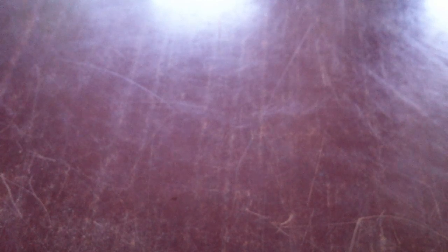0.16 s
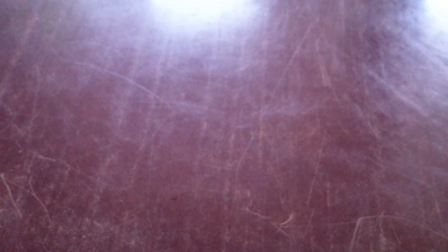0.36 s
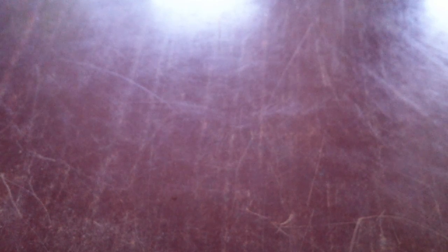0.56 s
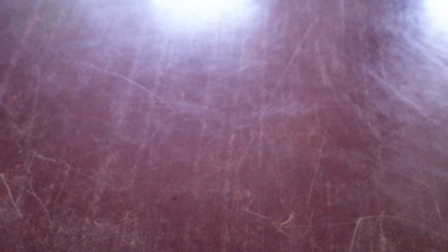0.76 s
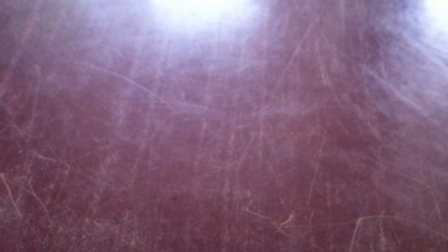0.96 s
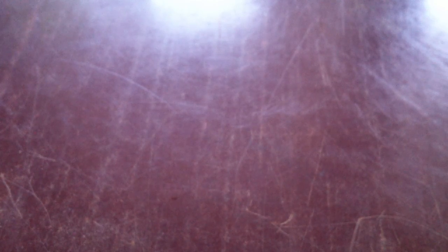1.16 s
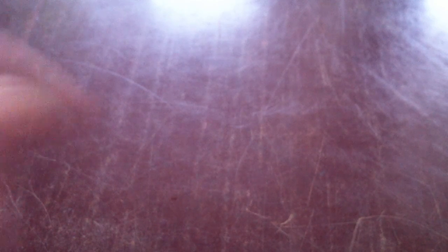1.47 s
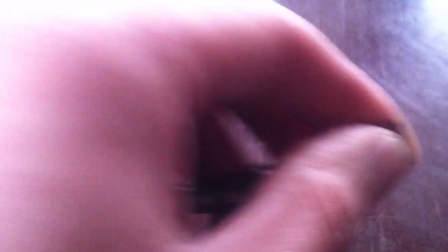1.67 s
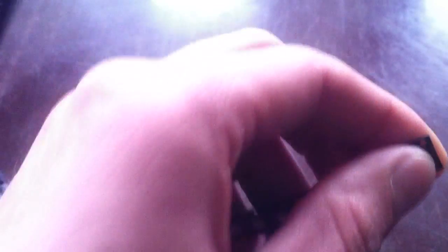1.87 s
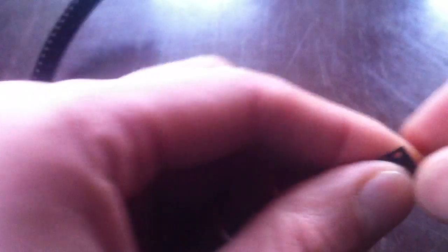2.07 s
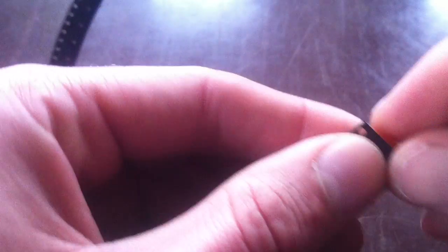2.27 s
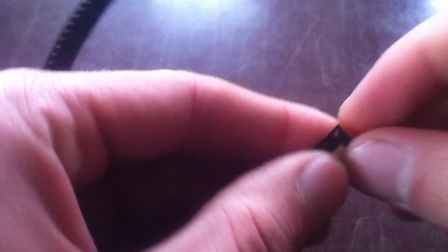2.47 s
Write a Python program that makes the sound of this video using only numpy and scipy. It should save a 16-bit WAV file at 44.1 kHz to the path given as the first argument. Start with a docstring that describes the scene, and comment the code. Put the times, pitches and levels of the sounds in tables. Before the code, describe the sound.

Close up in a small, quiet room, a thin plastic strip gives sharp ticks and tiny scuffs in the fingers, slides briefly, then rasps loudly over an edge with a bench knock and a ringing tail.

```python
"""A strip of plastic carrier tape ticks, scuffs and slides in the fingers, then rasps over an edge.
Ticks and catches are snaps of short strip modes, a click and scattered crackle; each catch also feeds
a dense ring, clear modes and a sinking body tone. Scuffs, slide and hand rustle are grainy friction.
Bench bumps are struck low modes; touches and pushes of the hand are swells of low noise.
Shaped noise gives a faint room hiss and the room's echo."""
import sys
import numpy as np
from scipy import signal
from scipy.fft import rfft, irfft
from scipy.io import wavfile

SR = 44100
rng = np.random.default_rng(int(sys.argv[2]) if len(sys.argv) > 2 else 0)


def digitize_waveform(pressure):
    """Quantize a signal to 16-bit integers and store it at the path in sys.argv[1].

    Rows of a 2-D input are taken as channels; values are limited to [-1, 1].
    """
    field = np.atleast_2d(pressure).T
    bounded = np.clip(field, -1, 1)
    quanta = np.round(bounded * 32767).astype(np.int16)
    wavfile.write(sys.argv[1], SR, quanta)


N = 114660  # length in samples


def amp(db):
    """Decibels to gain."""
    return 10 ** (np.asarray(db) / 20)


def unit(x):
    """Scales a sound to energy 1."""
    return x / np.sqrt(np.sum(x ** 2) + 1e-20)


def evened(x):
    """Scales a sound to rms 1."""
    return unit(x) * np.sqrt(len(x))


def noise(length):
    """White noise."""
    return rng.standard_normal(length)


def read(points, hz):
    """Reads a curve of (pitch_hz, value) points on a log-frequency axis."""
    point_hz, value = np.transpose(points)
    return np.interp(np.log(hz + 1), np.log(point_hz + 1), value)


def level(points):
    """Gain over time from (time_s, level_db) points."""
    return amp(np.interp(np.arange(N) / SR, *np.transpose(points)))


def add(mix, start_s, sound):
    """Mixes a sound in at its start time, cut off at the end of the mix."""
    part = mix[max(round(start_s * SR), 0):][:len(sound)]
    part += sound[:len(part)]


def coloured(x, points):
    """Gives a steady sound a spectrum, at rms 1."""
    gain = amp(read(points, np.fft.rfftfreq(len(x), 1 / SR)))
    return evened(irfft(rfft(x) * gain, len(x)))


def edge(x, hz, kind, order=2):
    """High-pass or low-pass filter."""
    sections = signal.butter(order, min(hz, SR / 2 - 1), kind, fs=SR, output="sos")
    return signal.sosfilt(sections, x)


def modes(table, t):
    """Struck modes: decaying sines, together at energy 1."""
    return unit(sum(amp(db - 60 * t / t60) * np.sin(2 * np.pi * hz * t) for hz, db, t60 in table))


def tail(colour, t60s):
    """Dense ringing: noise whose bands die at their own speeds, energy 1."""
    hz, t, bands = signal.stft(coloured(noise(SR // 2), colour), SR, nperseg=256)
    decay = amp(-60 * t / read(t60s, hz)[:, None])
    return unit(signal.istft(bands * decay, SR, nperseg=256)[1])


GRAINS_PER_S, GRAIN_SPREAD_DB = 3000, 3.5
GRAIN_SHARE = 0.77  # share of the energy in grains; the rest is smooth hiss
CLUMP_DB, CLUMP_HZ = 1.5, 107  # depth and top rate of the sticking and slipping


def friction(colour):
    """Tiny slips of uneven size over a smooth hiss, in clumps as the surface sticks and lets go."""
    sizes = amp(GRAIN_SPREAD_DB * np.minimum(rng.exponential(1, N), 5))
    signs = rng.choice([-1, 1], N)
    slips = sizes * signs * (rng.random(N) < GRAINS_PER_S / SR)
    clumps = amp(CLUMP_DB * evened(edge(noise(N), CLUMP_HZ, "low")))
    grains = np.sqrt(GRAIN_SHARE) * evened(slips * clumps)
    hiss = np.sqrt(1 - GRAIN_SHARE) * evened(noise(N))
    return coloured(grains + hiss, colour)


def swells(table, colour):
    """Brief, soft-edged swells of coloured noise."""
    out = np.zeros(N)
    for start_s, length_s, level_db in table:
        swell = np.hanning(round(length_s * SR))
        grain = evened(coloured(noise(SR // 4), colour)[:len(swell)])
        add(out, start_s, amp(level_db) * swell * grain)
    return out


# spectrum of the room hiss: pitch_hz, level_db
HISS_COLOUR = [(15, -36), (25, -2.5), (59, -23.5), (169, -1.5), (433, -6), (620, -7.5), (1100, -11.5),
               (1800, -16), (3260, -15.5), (8580, -14), (15500, -26)]
HISS_DB = -71


def room_hiss():
    """Steady background hiss: white noise given a fixed spectrum."""
    return amp(HISS_DB) * coloured(noise(N), HISS_COLOUR)


# loudness of the hands' dull rustle: time_s, level_db
RUSTLE_LEVEL = [(0, -74), (.5, -71.5), (.62, -69), (.9, -72.5), (1.2, -71), (1.33, -65), (1.5, -66),
                (1.78, -65.5), (2.2, -63), (2.28, -65), (2.45, -68), (2.6, -70)]
# spectrum of that rustle: pitch_hz, level_db
RUSTLE_COLOUR = [(60, -27), (140, -16), (230, -2), (330, -11.5), (600, -13), (1500, -13), (4000, -15),
                 (12000, -23)]


def hand_rustle():
    """Soft friction of the hands, its loudness following the movement."""
    return friction(RUSTLE_COLOUR) * level(RUSTLE_LEVEL)


# scuffs of fingers and strip, each played for twice length_s: start_s, length_s, level_db, low_edge_hz
SCUFFS = [(0.221, 0.018, -46, 3620), (0.239, 0.015, -42.5, 2000), (0.522, 0.037, -53.5, 2930),
          (0.552, 0.018, -56.5, 3520), (0.575, 0.012, -42, 4200), (0.608, 0.039, -53, 3740),
          (0.643, 0.016, -45, 3200), (0.673, 0.032, -52, 3020), (0.704, 0.03, -51, 2950),
          (0.736, 0.054, -55.5, 3500), (0.774, 0.013, -36, 2860), (0.787, 0.058, -53, 2930),
          (0.904, 0.013, -53.5, 2510), (1.14, 0.015, -58, 2900), (1.248, 0.013, -46.5, 3000),
          (1.295, 0.039, -56, 3000), (1.314, 0.024, -54, 2500), (1.734, 0.028, -53, 2420),
          (2.074, 0.023, -49.5, 2500), (2.107, 0.053, -57, 2520), (2.215, 0.034, -65, 1050)]
# spectrum of the rub before its low edge: pitch_hz, level_db
SCUFF_COLOUR = [(200, -6), (1000, -7), (3000, 3), (6500, 7), (9000, 4), (11000, -6), (16000, 2)]
SCUFF_ATTACK_S = 0.003
SCUFF_FADE_DB = -12.5  # how far a scuff has faded at length_s


def scuffs():
    """Short friction rubs that start quickly and fade ever faster."""
    out = np.zeros(N)
    rub = friction(SCUFF_COLOUR)
    for start_s, length_s, level_db, low_hz in SCUFFS:
        t = np.arange(0, 2 * length_s, 1 / SR)
        grain = evened(edge(rub[round(start_s * SR):][:len(t)], low_hz, "high"))
        attack = np.minimum(t / SCUFF_ATTACK_S, 1)
        add(out, start_s, grain * attack * amp(level_db + SCUFF_FADE_DB * (t / length_s) ** 3))
    return out


# short modes of the strip at pitch ratio 1: pitch_hz, level_db, t60_s
STRIP_MODES = [(2836, 4, 0.009), (4840, -5, 0.0095), (6000, 8, 0.0039), (6720, 5, 0.0075),
               (8950, -11, 0.0082), (12000, -4, 0.0097), (14200, -3, 0.009), (15300, 3.5, .008)]
# spectrum of the scattered crack: pitch_hz, level_db
CRACK_COLOUR = [(100, -48), (600, 2.5), (1800, -10), (3000, -1.5), (7000, -8), (10000, -3), (16000, -9.5)]
# dull push under each snap, before its 220 Hz high-pass: pitch_hz, level_db, t60_s
THOCK_MODES = [(169, -13, 0.0084), (656, 4, 0.0048)]
THOCK_DB = -25
SPIKE_TOP_HZ = 9000  # top of the band of the sharp first edge


def snap(low_hz, high_hz, scatter, pitch_ratio, crack_s, leak_db, spike_db):
    """A sharp edge, strip modes pitched by the grip and a scattered crack, in the contact's band."""
    t = np.arange(SR // 30) / SR
    scatter = np.clip(scatter, 0, 1)
    crack = unit(coloured(noise(len(t)), CRACK_COLOUR) * np.exp(-t / crack_s))
    spike = unit(edge(1. * (t == 0), SPIKE_TOP_HZ, "low"))
    strip = unit(modes(STRIP_MODES, t * pitch_ratio) + amp(spike_db) * spike)
    contact = np.sqrt(1 - scatter) * strip + np.sqrt(scatter) * crack
    # a steep low cut, with a little of a gentler one leaking through
    steep = edge(contact, low_hz, "high", order=3)
    leak = amp(leak_db) * edge(contact, low_hz, "high", order=1)
    thock = edge(modes(THOCK_MODES, t), 220, "high")
    return unit(edge(steep + leak, high_hz, "low")) + amp(THOCK_DB) * thock


# ticks of the plastic strip (scatter is held to 0-1):
# start_s, level_db, low_edge_hz, high_edge_hz, scatter, pitch_ratio
TICKS = [(0.236, -23.5, 5000, 7700, 0.5, 1), (0.2421, -5, 2070, 15000, 0.05, 1.04),
         (0.3325, -18.5, 3750, 11400, 0.22, 0.99), (0.4183, -36, 5140, 9800, 0.3, 1.2),
         (0.5764, -22, 7400, 16200, 0.1, 1.35), (0.5914, -25, 7860, 16000, 0, 1.24),
         (0.613, -31, 4530, 11000, 0.5, 0.84), (.646, -45, 3520, 11000, 0.5, 1.7),
         (0.679, -31, 3520, 11100, 1.1, 1.1), (0.7107, -28, 5000, 12000, 0.1, 1.1),
         (.774, -13.5, 3330, 12700, 0.77, 0.79), (0.777, -21.5, 2420, 12100, 0.8, 1.28),
         (0.7969, -25, 4000, 11000, 0.9, 0.73), (0.813, -23.5, 4000, 10000, 0.44, 0.88),
         (0.926, -39, 895, 1446, 0.5, 0.42), (1.0579, -35.5, 5870, 14000, 0.46, 1.3),
         (1.2533, -24, 4540, 15100, 0, 1.05), (1.255, -24.5, 1670, 15000, 0, 0.85),
         (1.2964, -31.5, 3520, 10000, 0.2, 1.14), (1.3152, -24.5, 3340, 12100, 0.5, 1.1),
         (1.3246, -23.5, 4720, 11100, 0.3, 1.04), (1.4011, -25, 4000, 12000, 1.15, 1.2),
         (1.6034, -33, 1500, 2300, 0.1, 0.66), (1.7092, -32, 6650, 16300, 0.6, 1.6)]
# spectrum of the soft echo of a tick before its band edges: pitch_hz, level_db
TICK_ECHO_COLOUR = [(500, -18), (1200, -4), (2500, -3.5), (3400, -3.5), (4300, -4.5), (6500, 2),
                    (8500, -3.5), (10500, -8), (15000, -9)]
# decay of the room, for tick echoes and the room's echo alike: pitch_hz, t60_s
ROOM_T60 = [(200, 0.21), (2000, 0.61), (7000, 0.28), (15000, 0.22)]
TICK_CRACK_S, TICK_LEAK_DB = 0.0016, -42
TICK_SPIKE_DB, TICK_ECHO_DB = -8.5, -16  # beside the modes; beside the tick


def ticks():
    """Single snaps as the strip flexes, each with a soft, diffuse echo in its own band."""
    out = np.zeros(N)
    for start_s, level_db, low_hz, high_hz, scatter, pitch_ratio in TICKS:
        echo = edge(tail(TICK_ECHO_COLOUR, ROOM_T60), low_hz, "high")
        echo = unit(edge(echo, high_hz, "low"))
        tick = snap(low_hz, high_hz, scatter, pitch_ratio, TICK_CRACK_S, TICK_LEAK_DB, TICK_SPIKE_DB)
        add(out, start_s, amp(level_db) * tick)
        add(out, start_s, amp(level_db + TICK_ECHO_DB) * echo)
    return out


# soft touches of fingers on strip and bench: start_s, length_s, level_db
TOUCHES = [(.585, 0.05, -62), (1.305, 0.037, -63), (1.73, 0.02, -60.5), (1.762, 0.043, -63.5),
           (2.21, 0.073, -72.5), (2.312, 0.055, -59.5), (2.365, 0.074, -68)]
# spectrum of a touch: pitch_hz, level_db
TOUCH_COLOUR = [(100, -30), (225, 5), (330, -3.5), (480, -10), (610, -1.5), (760, -15), (1400, -12),
                (4000, -29)]


def touches():
    """Fingers meet strip and bench softly: short swells of dull noise."""
    return swells(TOUCHES, TOUCH_COLOUR)


# bumps on the bench: start_s, level_db
BUMPS = [(0.7766, -19), (1.826, -26.5), (1.98, -31)]
# modes of the bench top before its low cut: pitch_hz, level_db, t60_s
BENCH_MODES = [(164, -7, 0.2), (213, 1, 0.14), (275, 1.5, 0.036), (407, 0.5, 0.034), (650, 1, 0.011),
               (1430, -5.5, 0.027)]
BENCH_LOW_HZ = 141


def bumps():
    """Low knocks of the bench top: struck modes above a steep low cut."""
    out = np.zeros(N)
    knock = modes(BENCH_MODES, np.arange(SR // 2) / SR)
    knock = unit(edge(knock, BENCH_LOW_HZ, "high", order=5))
    for start_s, level_db in BUMPS:
        add(out, start_s, amp(level_db) * knock)
    return out


# loudness of the strip sliding along: time_s, level_db
SLIDE_LEVEL = [(1.34, -69), (1.36, -66.5), (1.414, -44), (1.446, -52.5), (1.454, -48), (1.482, -57.5),
               (1.49, -49), (1.614, -50.5), (1.62, -45), (1.7, -74)]
# spectrum of the slide: pitch_hz, level_db
SLIDE_COLOUR = [(240, -52), (400, -7), (623, -20), (796, -20), (1560, -16), (1850, -14), (3210, -7),
                (3680, -5), (6680, 3.5), (15500, -5.5)]
SLIDE_FADE_S = 0.033  # time constant of the fade at either end


def slide():
    """One long, gritty slide of the strip: friction swelling and dipping in level."""
    t = np.arange(N) / SR
    before = SLIDE_LEVEL[0][0] - t
    after = t - SLIDE_LEVEL[-1][0]
    outside = np.maximum(np.maximum(before, after), 0)
    return friction(SLIDE_COLOUR) * level(SLIDE_LEVEL) * np.exp(-outside / SLIDE_FADE_S)


# soft pushes of the moving hand: start_s, length_s, level_db
PUSHES = [(1.81, 0.044, -64), (1.903, 0.044, -71)]
# spectrum of a push: pitch_hz, level_db
PUSH_COLOUR = [(15, -8), (35, -19), (70, 1), (130, -5), (400, -44), (2000, -82)]


def pushes():
    """The moving hand pushes softly: short swells of deep rumble."""
    return swells(PUSHES, PUSH_COLOUR)


# catches of the tape dragged over the edge (scatter 0-1):
# start_s, snap_db, low_edge_hz, high_edge_hz, scatter, pitch_ratio, ring_db
CATCHES = [(1.8239, -7.5, 1490, 6900, 0.15, 0.85, -7), (1.8258, -6, 794, 3930, 0.78, 0.6, -9.5),
           (1.8315, -30, 895, 7500, 0.3, 0.73, -8), (1.8438, -15, 3020, 9000, 0.7, 0.56, -13),
           (1.8492, -9, 2450, 16000, 0.6, 0.89, -9), (1.8678, -3, 1320, 10900, 0.77, 1.64, -9),
           (1.893, -8, 3900, 7540, 0.04, 1, -11), (1.9142, -9, 670, 9000, 0.92, 0.59, -8.5),
           (1.9292, -9.5, 1200, 16000, 1, 0.94, -14), (1.9352, -13, 1490, 12000, 0.84, 0.73, -13),
           (1.9477, -13, 3300, 7540, 0.1, .8, -13), (1.962, -11, 1610, 9500, 0.3, 1.2, -18),
           (1.977, -11.5, 1940, 12000, 0.76, 0.87, -10), (1.991, -12.5, 1790, 6940, 0.3, 1, -25),
           (1.9988, -17, 1190, 6900, 0.82, 0.74, -28), (2.002, -22, 1500, 12100, 0.87, 0.89, -18.5),
           (2.015, -22.5, 1490, 9000, 1, 1.13, -26)]
# spectrum of the dense ring: pitch_hz, level_db
RING_COLOUR = [(59, -62), (100, -43), (243, -0.5), (500, -12.5), (660, 1.5), (850, -9), (960, 3.5),
               (1350, 2), (1760, 7), (2250, -2), (2750, 2.5), (3500, -6.5), (4200, 1.5), (4700, -6.5),
               (6000, 0.5), (7600, -6), (9900, -3.5), (12200, -10.5), (13400, -1.5), (15500, -9)]
# decay of the dense ring: pitch_hz, t60_s
RING_T60 = [(150, 0.53), (650, 0.35), (1800, 0.23), (4500, 0.36), (9000, 0.32), (15000, 0.17)]
CATCH_LEAK_DB, CATCH_SPIKE_DB = -42, 2
CATCH_CRACK_S, CATCH_SCATTER_S = 0.001, 0.0017  # the crack lasts longer the more it scatters
RING_SAME = 0.033  # share of the dense ring that is alike for every catch
RING_RISE_S = 0.0043  # build-up after each catch


def rasp():
    """Each catch of the dragged tape snaps and feeds a long, dense ring."""
    out = np.zeros(N)
    t = np.arange(SR // 2) / SR
    rise = np.minimum(t / RING_RISE_S, 1)
    shared = tail(RING_COLOUR, RING_T60)
    for start_s, snap_db, low_hz, high_hz, scatter, pitch_ratio, ring_db in CATCHES:
        ring = np.sqrt(RING_SAME) * shared + np.sqrt(1 - RING_SAME) * tail(RING_COLOUR, RING_T60)
        crack_s = CATCH_CRACK_S + CATCH_SCATTER_S * np.clip(scatter, 0, 1) ** 2
        catch = snap(low_hz, high_hz, scatter, pitch_ratio, crack_s, CATCH_LEAK_DB, CATCH_SPIKE_DB)
        add(out, start_s, amp(snap_db) * catch)
        add(out, start_s, amp(ring_db) * ring[:len(t)] * rise)
    return out


def stored(t60_s):
    """Amplitude of a resonance that every catch tops up and that dies away between them."""
    energy = np.zeros(N)
    fade = unit(amp(-60 * np.arange(SR // 2) / SR / t60_s))
    for start_s, *_, ring_db in CATCHES:
        add(energy, start_s, (amp(ring_db) * fade) ** 2)
    return np.sqrt(energy)


# clear modes set ringing by the catches, levels relative to each other:
# pitch_hz, first_catch_db, last_catch_db
CLEAR_MODES = [(1507, -56, -66), (1724, -58, -58), (1749, -53, -60), (2988, -64, -58), (4206, -46, -65),
               (5930, -54, -56), (8086, -59, -47), (8275, -52, -53), (9950, -56, -66), (12990, -59, -51),
               (13400, -57, -66), (14500, -56, -75)]
CLEAR_DB, CLEAR_T60_S, CLEAR_WIDTH_HZ = -4.5, 0.29, 6
BODY_HZ, BODY_SAG_HZ_PER_S, BODY_LOWEST_HZ = 698.5, 480, 575
BODY_DB, BODY_T60_S, BODY_WIDTH_HZ = -11.5, 0.23, 97


def singing():
    """Clear modes trade strength as the strip is drawn out, over a fuzzy hollow tone that sinks."""
    since = np.arange(N) / SR - CATCHES[0][0]
    drawn = np.clip(since / (CATCHES[-1][0] - CATCHES[0][0]), 0, 1)
    clear = np.zeros(N)
    for hz, first_db, last_db in CLEAR_MODES:
        # wandering phase widens each mode a little
        drift = np.cumsum(noise(N)) * np.sqrt(2 * np.pi * CLEAR_WIDTH_HZ / SR)
        strength = amp(first_db + (last_db - first_db) * drawn)
        clear += strength * np.sin(2 * np.pi * hz * since + drift)
    body_hz = np.maximum(BODY_HZ - BODY_SAG_HZ_PER_S * np.maximum(since, 0), BODY_LOWEST_HZ)
    fuzz = edge(noise(N) + 1j * noise(N), BODY_WIDTH_HZ / 2, "low")
    fuzz = fuzz / np.sqrt(abs(fuzz) + 1e-20)  # halves the swings in level, in dB
    body = (fuzz * np.exp(2j * np.pi * np.cumsum(body_hz) / SR)).real
    clear = amp(CLEAR_DB) * stored(CLEAR_T60_S) * evened(clear)
    return clear + amp(BODY_DB) * stored(BODY_T60_S) * evened(body)


# colour of the room's echo: pitch_hz, level_db
ROOM_COLOUR = [(100, -5.5), (2500, -11), (7000, -8), (15000, -5)]
ROOM_DB = -11


def room_echo(near):
    """The small room answers with a diffuse, decaying noise tail."""
    return amp(ROOM_DB) * signal.fftconvolve(near, tail(ROOM_COLOUR, ROOM_T60))[:N]


def scene():
    """Tape, bench and hands in a small room with a steady hiss."""
    hands = hand_rustle() + touches() + pushes()
    near = hands + scuffs() + bumps() + slide() + rasp() + singing()
    # ticks bring their own echo, so they stay out of the room's
    return (near + ticks() + room_echo(near) + room_hiss())[None]


def record(dry):
    """The recorder's band limit: a steep low-pass at 15.9 kHz without phase shift."""
    low_pass = signal.firwin(255, 15900, window=("kaiser", 8), fs=SR)
    return signal.oaconvolve(dry, low_pass[None], "same")


dry = scene()
out = record(dry)
digitize_waveform(out)
```